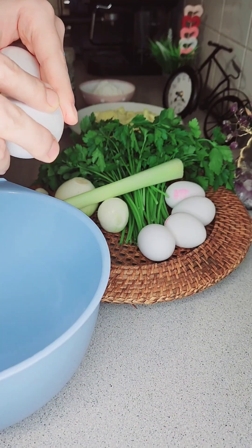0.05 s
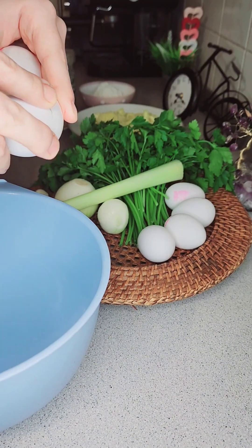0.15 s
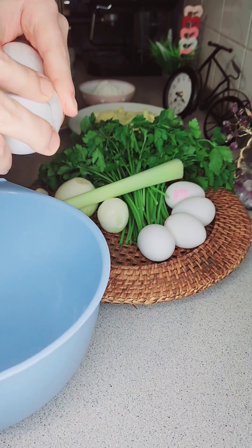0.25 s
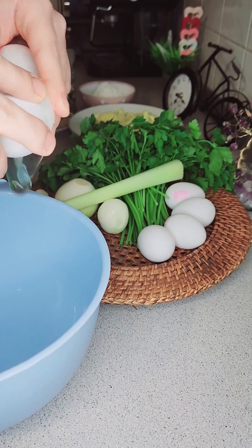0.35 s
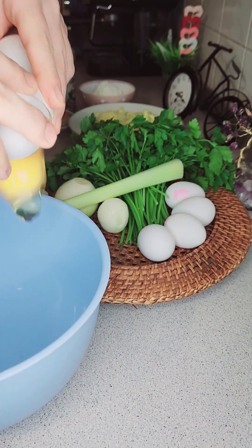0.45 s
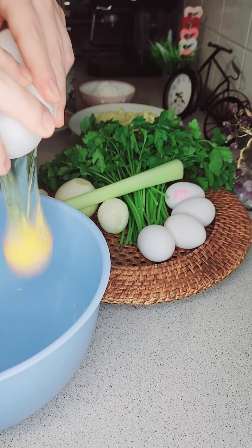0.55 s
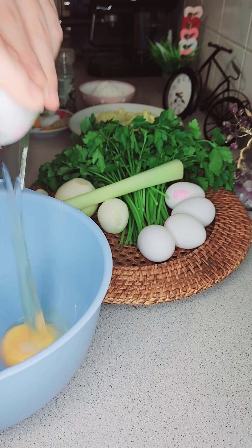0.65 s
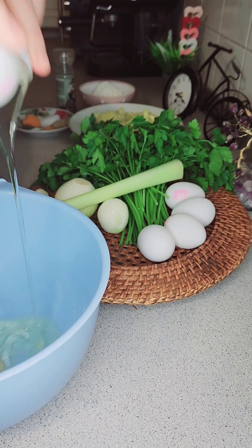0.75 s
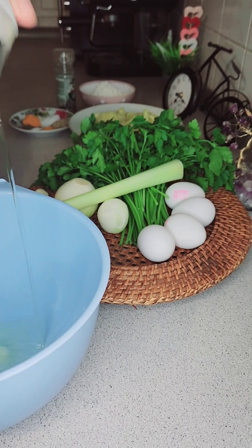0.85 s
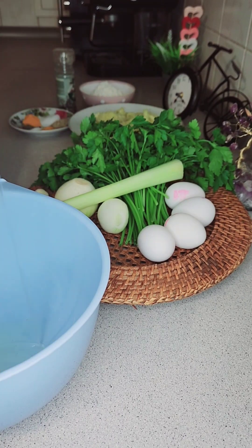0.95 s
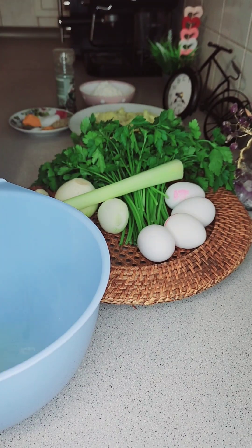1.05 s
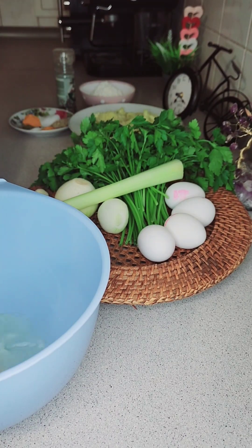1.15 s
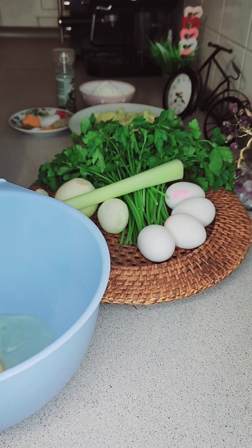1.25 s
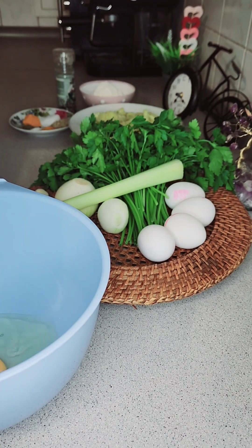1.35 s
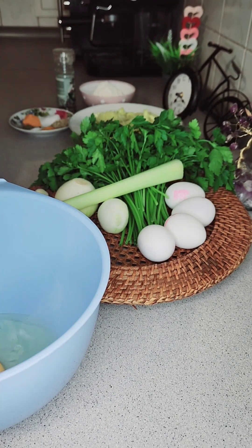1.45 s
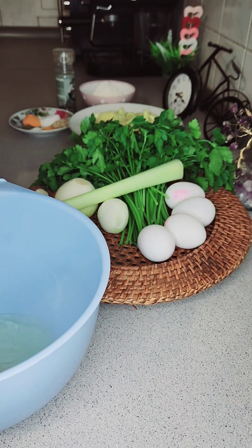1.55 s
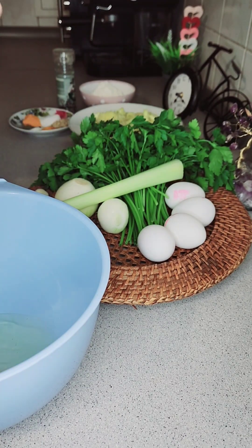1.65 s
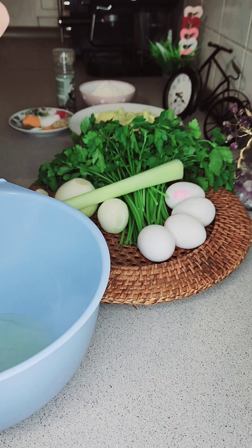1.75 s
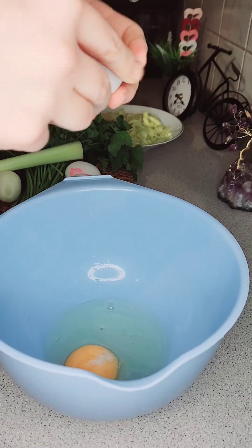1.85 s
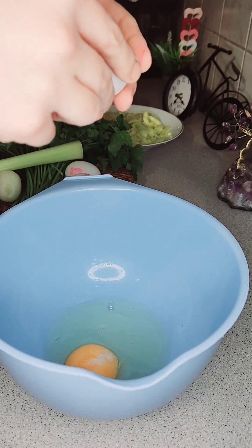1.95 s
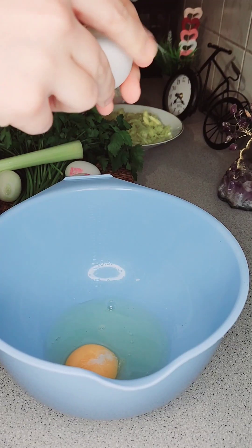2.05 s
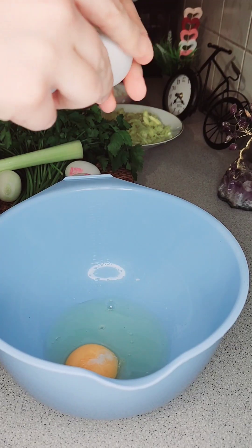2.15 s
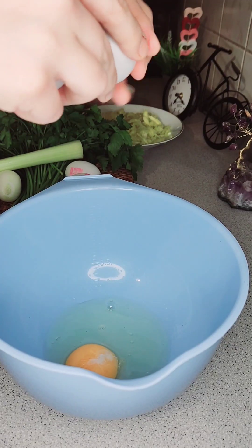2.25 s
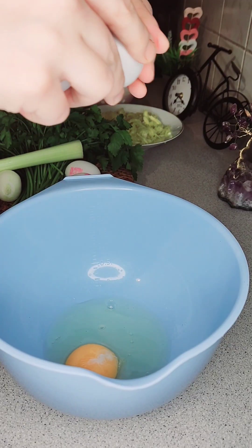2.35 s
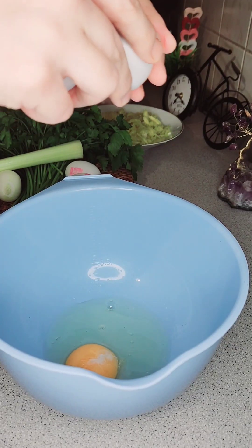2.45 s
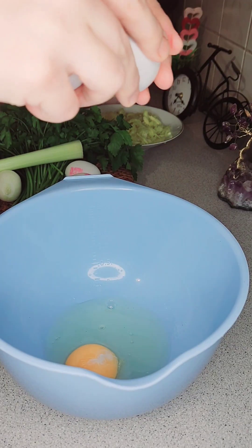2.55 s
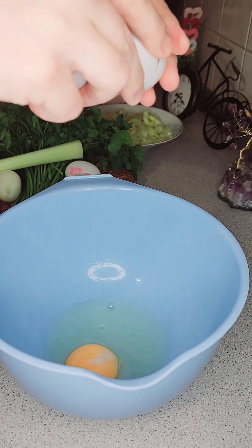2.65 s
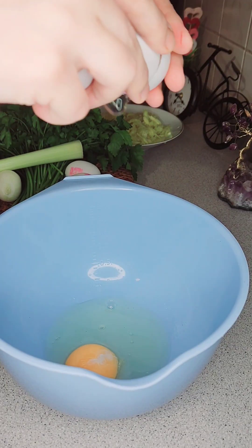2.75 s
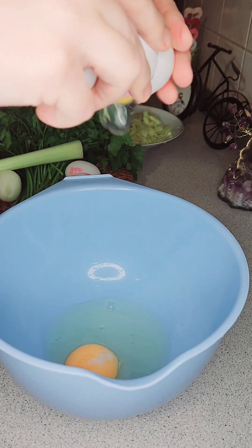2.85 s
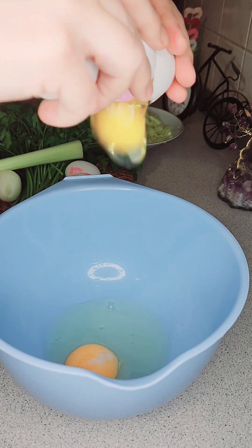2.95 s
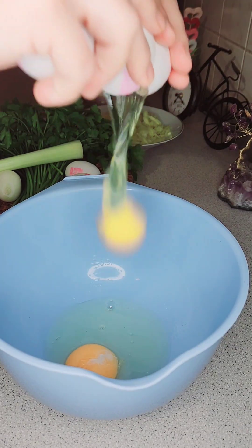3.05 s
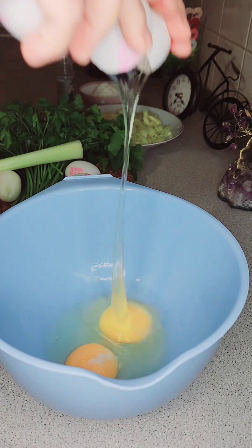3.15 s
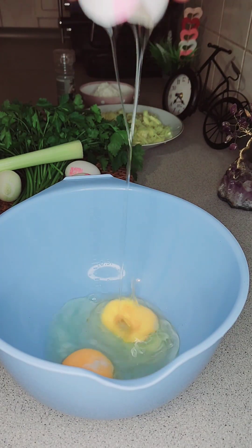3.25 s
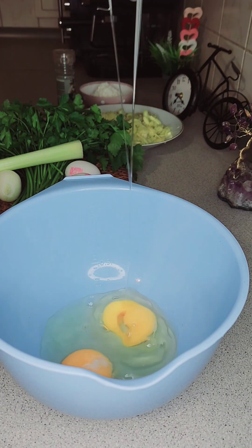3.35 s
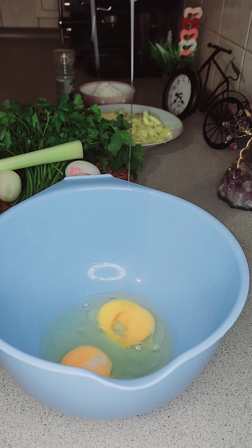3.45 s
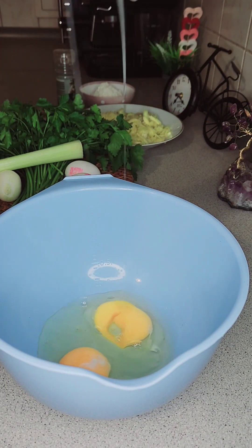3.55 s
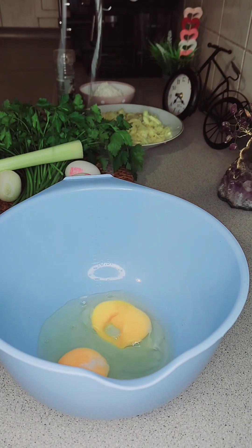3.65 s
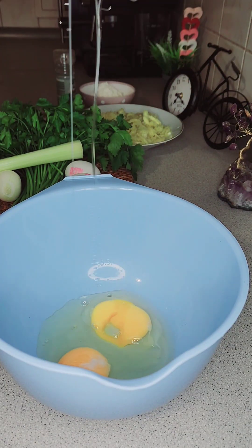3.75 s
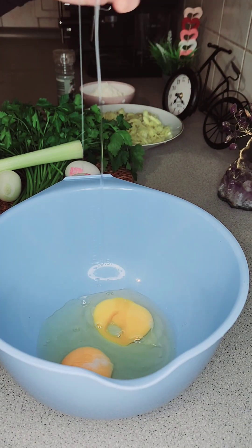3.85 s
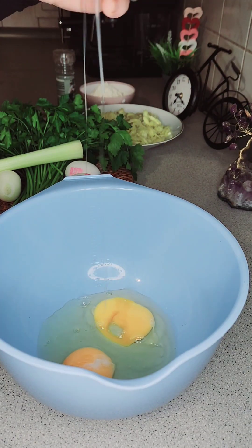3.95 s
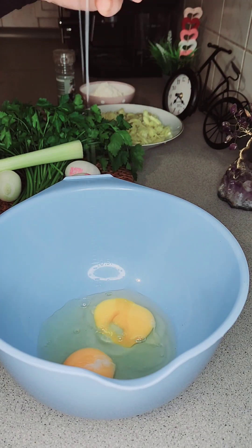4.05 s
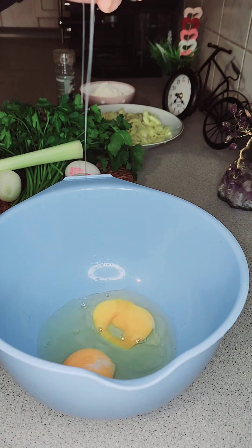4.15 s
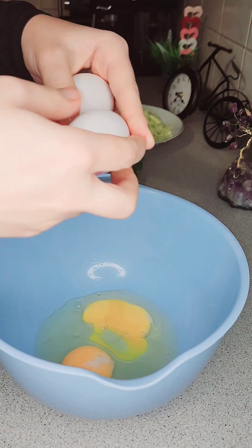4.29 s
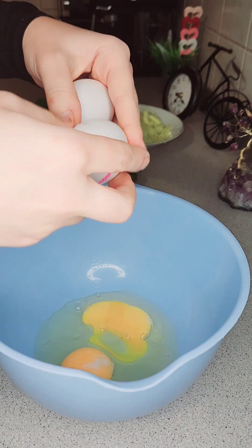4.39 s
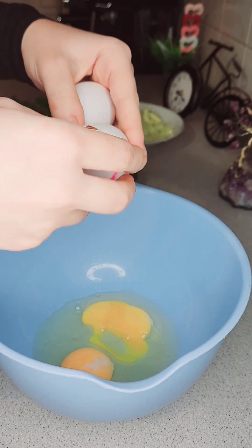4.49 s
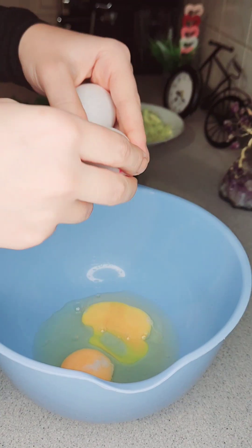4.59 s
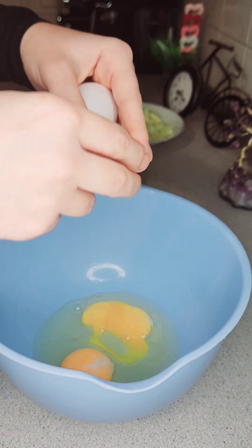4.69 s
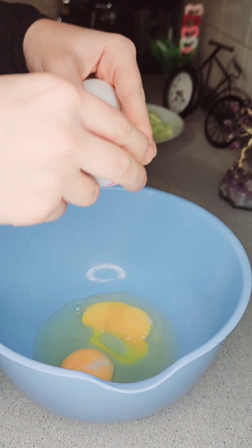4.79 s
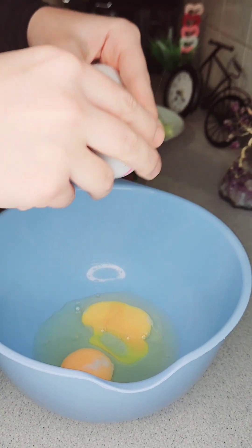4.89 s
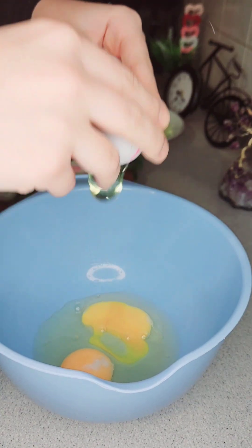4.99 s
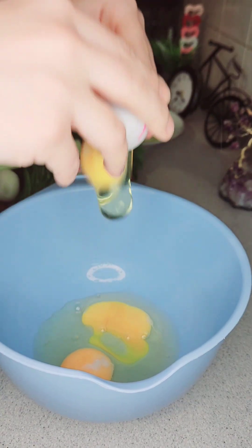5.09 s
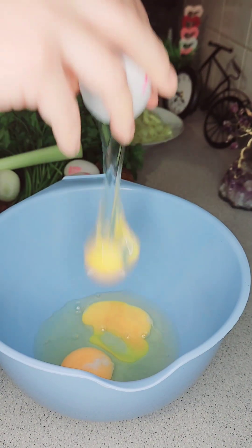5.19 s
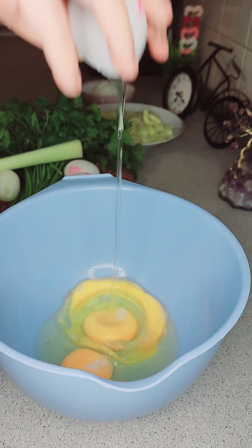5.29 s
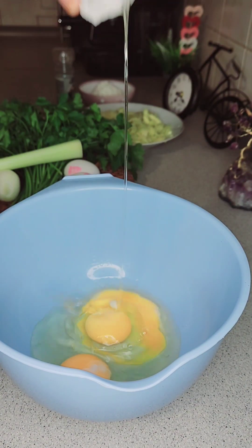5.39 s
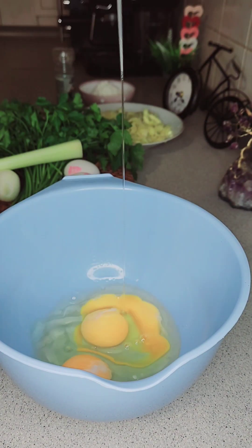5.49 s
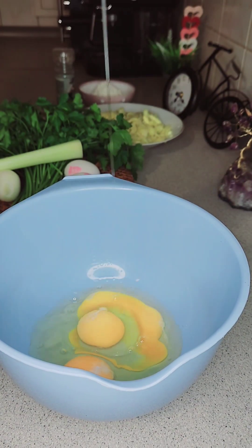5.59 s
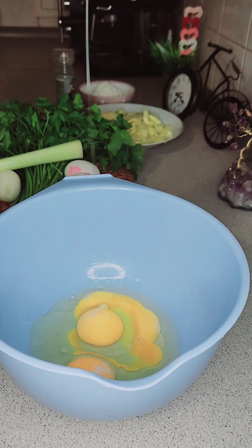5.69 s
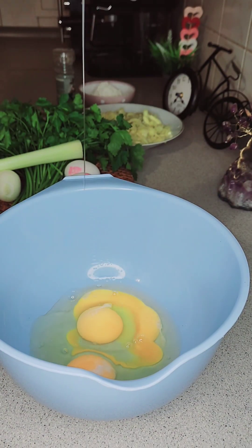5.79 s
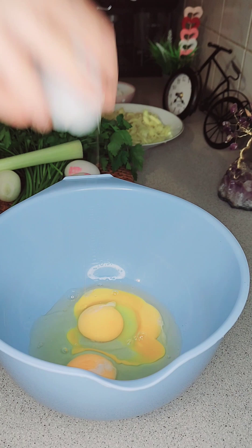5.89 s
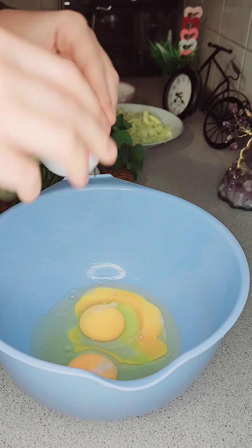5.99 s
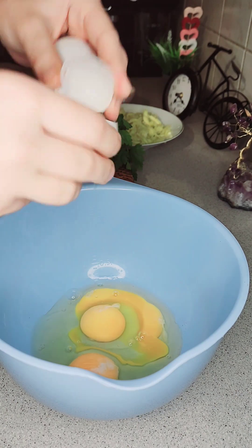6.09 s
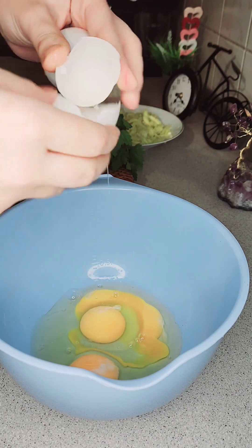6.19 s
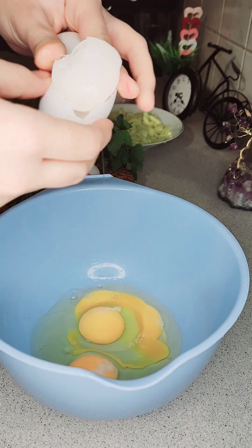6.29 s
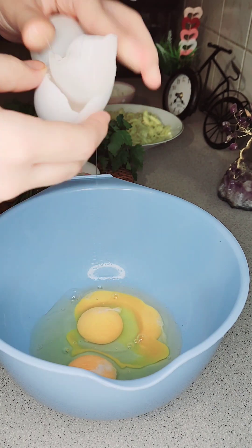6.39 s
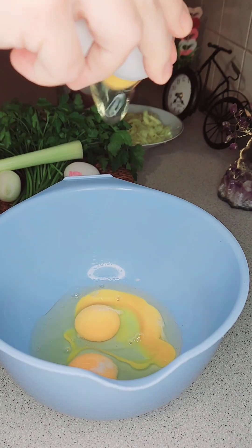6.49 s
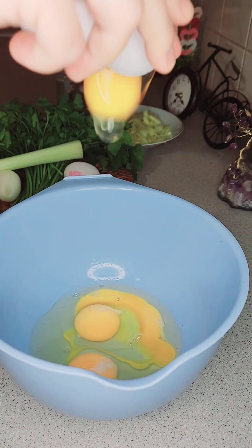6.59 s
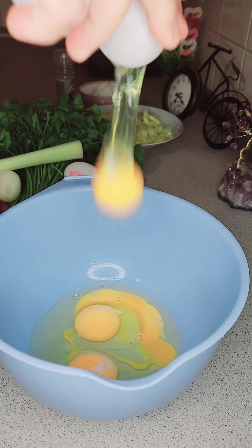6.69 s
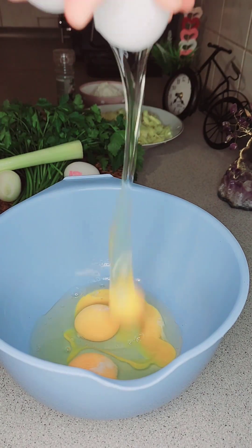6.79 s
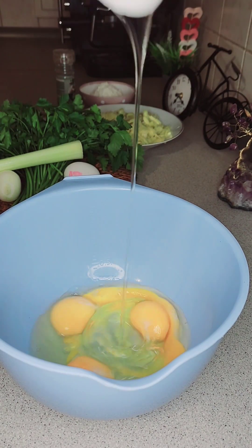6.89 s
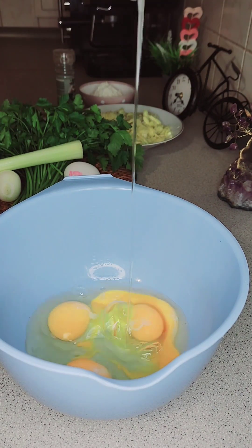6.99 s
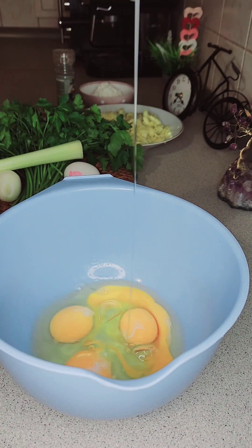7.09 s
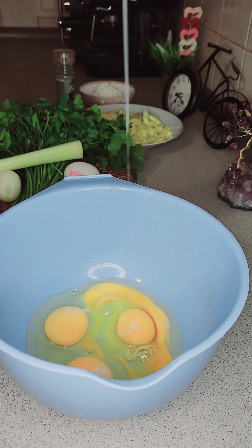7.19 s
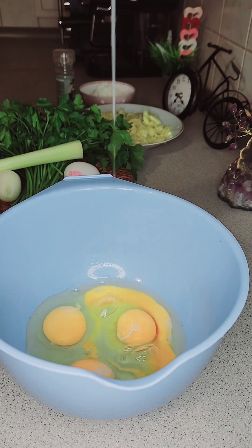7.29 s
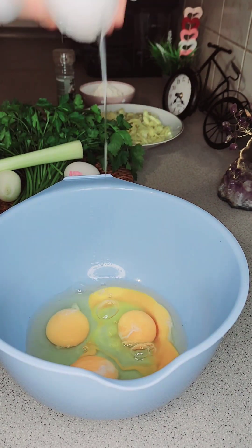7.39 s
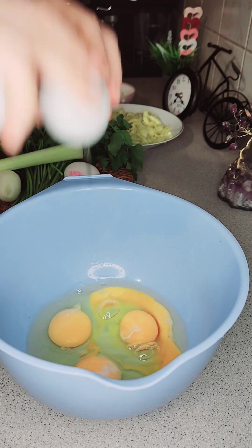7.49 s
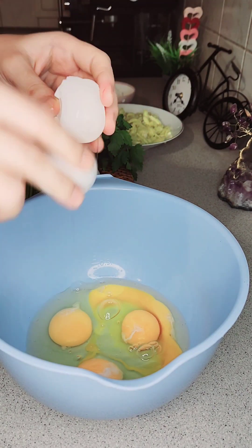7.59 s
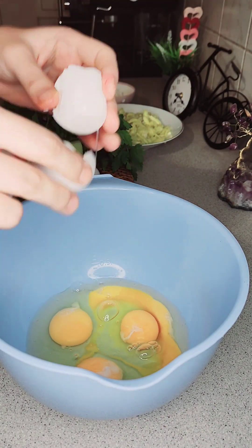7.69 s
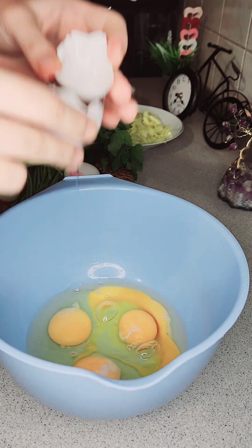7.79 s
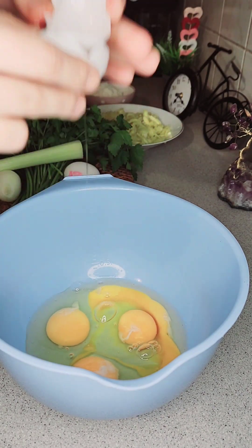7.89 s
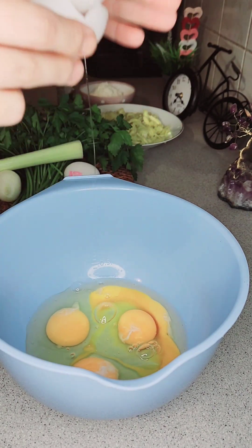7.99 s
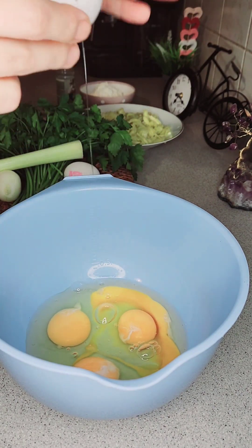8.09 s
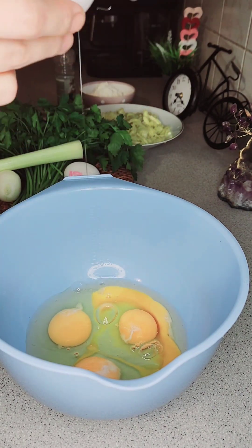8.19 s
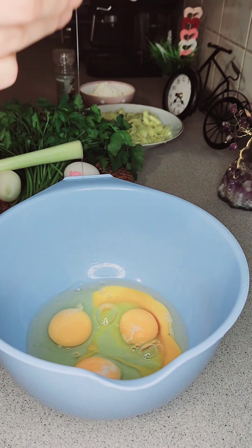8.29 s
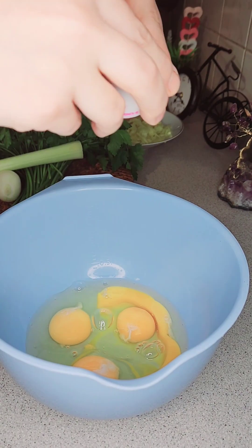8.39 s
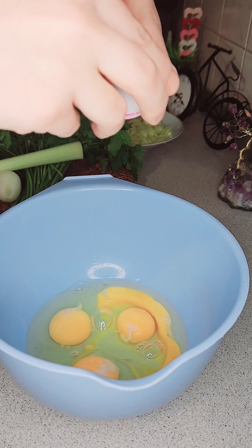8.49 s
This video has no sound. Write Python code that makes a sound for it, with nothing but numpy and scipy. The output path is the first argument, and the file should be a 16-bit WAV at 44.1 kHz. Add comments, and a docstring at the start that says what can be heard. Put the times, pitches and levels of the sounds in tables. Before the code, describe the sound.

A close stereo phone pickup in a quiet kitchen, with steady faint low rumble, murmur, hum and hiss. Faint shell crunches start at once, then sharp dry snaps at 0.25 and 0.35 s. Around 0.6 to 0.8 s more cracks merge with the strongest wet splat, a hollow bowl ring near 600 Hz, a bubble blip and a soft thump. Small ticks and crackles trail off, with light snaps near 1.8 and 2.4 s and a tiny falling squeak at 2.55 s. Crisp snaps and a softer plop come at 3.1 to 3.3 s. Shell edges grind around 4.1 s; a strong crack and crunch at 4.9 s leads to a dull landing at 5.2 s. Cracks at 6.4 to 6.9 s end in another small wet plop with a bubble. Scattered crunches, a brief scrape at 8.05 s and light ticks finish by 8.5 s. Shell sounds lean left with short bright echoes.

```python
"""Hands pry eggs open over a plastic bowl on a kitchen counter, close to a phone held upright.
Faint crunches lead to the first sharp snaps: bursts of noise grains with an unsteady fragment ring.
Yolk and white drop in: a splat, tones of air and bowl, and brief rising bubble tones, here and again later.
Then come a sliding squeak, grinding edges, and more snaps and landings.
Echoes of fading noise follow; shaped noise and a tone make the rumble, murmur, hiss and hum throughout."""
import sys
import numpy as np
from scipy import signal
from scipy.fft import rfft, irfft, next_fast_len
from scipy.io import wavfile
from scipy.ndimage import uniform_filter1d, map_coordinates

SR = 44100
rng = np.random.default_rng(int(sys.argv[2]) if len(sys.argv) > 2 else 0)


def dump(signal):
    """Clip the signal to [-1, 1] and save it as 16-bit WAV at the path in sys.argv[1]."""
    limited = np.clip(np.atleast_2d(signal).T, -1, 1)
    pcm = np.round(limited * 32767).astype(np.int16)
    wavfile.write(sys.argv[1], SR, pcm)


def undo_db(level):
    """Turn decibels back into plain size, where 20 dB means ten times bigger."""
    steps = np.asarray(level, float) / 20
    return 10 ** steps


N = 376569  # length in samples


def unit(x):
    """Scales to rms 1."""
    return x / np.sqrt(np.mean(x ** 2, axis=-1, keepdims=True) + 1e-20)


def along(points, hz):
    """Reads (Hz, value) points on a log frequency axis."""
    f, v = np.transpose(points)
    return np.interp(np.log(hz + 1), np.log(f + 1), v)


def curves(rows):
    """One value per sample for each column after the time."""
    s, *cols = np.transpose(rows)
    return [np.interp(np.arange(N) / SR, s, c) for c in cols]


def filtered(x, response):
    """Multiplies the spectrum of x by a response of frequency."""
    m = next_fast_len(x.shape[-1] + 2048)
    return irfft(rfft(x, m) * response(np.fft.rfftfreq(m, 1 / SR)), m)[..., :x.shape[-1]]


def low_cut(x, cut_hz, power):
    """Fades out what lies below cut_hz, without phase shift."""
    return filtered(x, lambda hz: 1 / (1 + (cut_hz / (hz + 1)) ** power))


def crackle(count, spiky_db, grain_s):
    """Fractures of uneven size: body and treble noise of rms 1 that share the same grain sizes."""
    # color of the shell body: pitch_hz, relative_level_db
    body_color = [(560, -47), (950, -11), (1220, -7), (1520, -7.5), (2050, 4.5), (2610, -4), (3580, -14.5),
                  (3930, -10.5), (6000, -8.5), (7800, -24.5), (13200, -120)]
    # color of the shell treble: pitch_hz, relative_level_db
    treble_color = [(3240, -21), (5500, -13), (6130, -14.5), (7820, -6), (9330, -23.5), (10500, -22),
                    (11400, -16.5), (12200, -12.5), (14000, -12.5), (16200, -27.5)]
    grain = round(grain_s * SR)
    sizes = undo_db(spiky_db * np.minimum(rng.exponential(size=count // 8 + 1), 3.5))
    grains = sizes[np.arange(count) // grain] * rng.standard_normal((2, count))
    return unit(filtered(grains, lambda hz: undo_db([along(body_color, hz), along(treble_color, hz)])))


def chips(per_s, mid_hz, spread, cycles, spiky_db):
    """Tiny shell chips, each a short ring at its own pitch; rms 1."""
    count = round(per_s * N / SR)
    starts = (rng.random(count) * N).astype(int)
    hz = mid_hz * np.exp(spread * rng.standard_normal(count))[:, None]
    sizes = undo_db(spiky_db * np.minimum(rng.exponential(size=count), 3))[:, None]
    k = np.arange(256)
    rings = sizes * np.exp(-k * hz / SR / cycles) * np.sin(2 * np.pi * hz * k / SR)
    train = np.bincount((starts[:, None] + k).ravel(), rings.ravel(), N + 256)[:N]
    return unit(train)


def snaps():
    """Each break is a dying burst of crackle; the loosened fragment rings unsteadily at its own pitch."""
    # shell snaps: start_s, level_db, fragment_ring_hz, treble_over_level_db, crackle_t60_s
    breaks = [(0.247, -14.5, 3847, -8, 0.064), (0.3587, -18.5, 3310, -1, 0.022),
              (0.614, -44, 3270, -14, 0.071), (0.6372, -17, 1880, -36, 0.045),
              (0.7291, -31, 1835, -21, 0.14), (0.7836, -20, 2630, -5, 0.017), (0.8732, -41, 2060, -7, 0.17),
              (0.9184, -37.5, 2100, -10.5, 0.095), (0.9472, -38.5, 4550, -14, 0.073),
              (1.043, -51, 2285, -10.5, 0.13), (1.2285, -47.5, 2210, -8.5, 0.04),
              (1.8337, -34, 2105, -1.5, 0.038), (1.904, -52.5, 3630, 3.5, 0.042),
              (2.4326, -34, 3820, -6, 0.024), (2.601, -36.5, 3230, -32, 0.064),
              (2.7573, -41, 2260, -4, 0.15), (2.8176, -39, 2057, -5.5, 0.077),
              (2.878, -44, 1990, -2.5, 0.046), (3.0696, -31, 4000, -10, 0.091), (3.18, -45, 6450, -6, 0.04),
              (3.206, -18, 4430, -9.5, 0.016), (3.268, -20, 1980, -6, 0.012),
              (3.7715, -52.5, 2160, 3.5, 0.069), (4.502, -33, 1200, -19, 0.049),
              (4.5273, -46.5, 3260, 11, 0.035), (4.62, -59.5, 6500, 1.5, 0.023),
              (4.661, -53, 6550, 0, 0.023), (4.71, -57, 6070, -0.5, .02), (4.785, -54.5, 4000, 2, 0.023),
              (4.8583, -35.5, 5270, 0, 0.063), (4.874, -19.5, 4460, -5.5, 0.03),
              (5.114, -31, 1655, -11.5, 0.083), (5.2058, -32, 1860, -38, 0.16),
              (5.2359, -39.5, 5340, 13.5, 0.036), (5.575, -43, 2400, -8.5, 0.11),
              (5.697, -50, 3180, -4, 0.17), (5.7158, -35.5, 3190, -3.5, 0.066),
              (5.873, -56, 3030, -2.5, 0.024), (6.345, -49, 2470, -2.5, 0.047),
              (6.4167, -28, 1970, -4, 0.046), (6.5953, -34, 1420, -7.5, 0.034),
              (6.744, -40, 2010, -9, 0.095), (6.7867, -40.5, 1998, -13.5, 0.25),
              (6.8533, -30, 2920, -6, 0.014), (6.8725, -27, 1630, -10.5, 0.037),
              (7.2353, -32, 5420, -32, 0.081), (7.281, -33, 3735, -6, 0.14),
              (7.6522, -39.5, 2350, -16, 0.038), (7.7922, -47, 5760, -6, 0.026),
              (8.2232, -34.5, 2436, -9, 0.057), (8.383, -65.5, 2710, 17, 0.036)]
    body_db, ring_db = -11.5, -5  # over the level of the snap
    out, t = np.zeros(N + SR), np.arange(8192) / SR
    for s, db, ring_hz, treble_db, t60 in breaks:
        fade = undo_db(-60 * t / t60) * (1 - np.exp(-t / 0.00082))
        body, bright = crackle(len(t), spiky_db=1.1, grain_s=0.00095)
        wander = np.cumsum(rng.standard_normal(len(t))) / 3
        ring = np.sin(2 * np.pi * ring_hz * t + wander)
        burst = undo_db(body_db) * body + undo_db(treble_db) * bright + undo_db(ring_db) * ring
        out[round(s * SR):][:len(t)] += undo_db(db) * fade * burst
    return out[:N]


def crunch():
    """Fingers crush the shell: dense tiny fractures and ringing chips; some start at once, others swell."""
    # squeezes that crush or tear the shell: start_s, rise_s, fall_s, level_db, treble_over_level_db
    squeezes = [(0, .001, 0.05, -54.5, 0), (.084, 0.0013, 0.037, -67, 7.5), (.168, .002, .04, -69, 8),
                (.193, .003, 0.095, -54, -4.5), (0.227, 0.00072, .06, -36.5, -6),
                (1.755, 0.0024, 0.09, -46, -7.5), (2.2, 0.035, 0.2, -63.5, 15),
                (3.474, 0.0011, 0.023, -53.5, 0), (4.042, 0.003, .02, -36.5, -13.5),
                (4.465, 0.031, 0.094, -48, -4), (4.874, 0.0074, .07, -30.5, -7),
                (4.929, 0.009, .025, -20, -18.5), (4.95, 0.0056, 0.069, -46, -5),
                (5.284, 0.039, 0.043, -34, -10), (6.2, .028, 0.058, -40.5, -6),
                (6.4793, 0.0009, 0.072, -37.5, -1.5), (6.983, 0.0009, 0.023, -48.5, -3),
                (7.1055, .001, 0.012, -39, -18), (7.1678, 0.00082, 0.096, -42, -6.5),
                (7.854, 0.0092, 0.11, -33.5, -17), (8.006, 0.021, 0.044, -38, -2.5),
                (8.12, .01, .12, -52, -3)]
    rise_power, fall_power = 1.2, 1.96  # bend of the rising and the falling ramp
    body, bright = crackle(N, spiky_db=4.5, grain_s=0.002)
    ringing = chips(per_s=450, mid_hz=2640, spread=0.287, cycles=7.6, spiky_db=4.5)
    body = undo_db(-4.5) * body + undo_db(-7.0) * ringing
    out, t = np.zeros(N), np.arange(N) / SR
    for s, rise, fall, db, treble_db in squeezes:
        onset = np.clip((t - s) / rise, 0, 1) ** rise_power
        fade = np.clip(1 - (t - s - rise) / fall, 0, 1) ** fall_power
        out += undo_db(db) * onset * fade * (body + undo_db(treble_db) * bright)
    return out


def grinds():
    """Broken edges rub under steady pressure: uneven crackle plus chips that ring near one pitch."""
    # steady presses: start_s, length_s, level_db, treble_over_level_db, rasp_hz
    presses = [(4.05, 0.1, -36, -6, 3610), (4.154, 0.063, -43.5, -13, 2160), (4.43, .03, -55.5, -12, 3000),
               (8.05, 0.07, -33, -4, 2720)]
    grip_s, let_go_s = 0.0062, 0.0093  # edges of a held press
    out, t = np.zeros(N), np.arange(N) / SR
    body, bright = crackle(N, spiky_db=5, grain_s=0.003)
    for s, length, db, treble_db, hz in presses:
        press = np.clip(np.minimum((t - s) / grip_s, 1 - (t - s - length) / let_go_s), 0, 1)
        rasp = chips(per_s=300, mid_hz=hz, spread=0.12, cycles=14, spiky_db=4.5)
        rub = undo_db(-3.5) * body + undo_db(-9) * rasp + undo_db(treble_db) * bright
        out += undo_db(db) * press * rub
    return out


def squeak():
    """A wet fingertip slips on the shell: a rough whistle that slides down in pitch."""
    # path of the slide: time_s, pitch_hz, level_db
    slide = [(2.551, 5620, -44.5), (2.575, 4300, -59), (2.599, 3280, -65)]
    s, hz, db = np.transpose(slide)
    t = np.arange(N) / SR
    phase = np.cumsum(2 * np.pi * np.interp(t, s, hz) / SR + 0.3 * rng.standard_normal(N))
    return undo_db(np.interp(t, s, db, -120, -120)) * np.sin(phase)


def ticks(per_s, db, spread_db, t60):
    """Faint stray ticks of shell and wet fingers: dying crackle at random moments."""
    count, t = round(per_s * N / SR), np.arange(2048) / SR
    sizes = undo_db(db + spread_db * rng.standard_normal(count))
    starts = np.bincount(rng.integers(0, N, count), sizes, N)
    body, bright = crackle(N, spiky_db=0.5, grain_s=0.00082)
    return signal.fftconvolve(starts, undo_db(-60 * t / t60))[:N] * (0.49 * body + bright)


def air_ring(hz, db, t):
    """The air in the bowl rings in a main mode and two weak ones, with a fast and a slow decay."""
    drift = np.cumsum(rng.standard_normal(len(t))) / 35  # random phase: the tone is slightly unsteady
    modes = np.sin(2 * np.pi * hz * t + drift)
    modes += 0.12 * np.sin(2 * np.pi * hz * 0.94 * t)
    modes += 0.11 * np.sin(2 * np.pi * hz * 1.6 * t)
    decay = undo_db(db - 60 * t / 0.063) + undo_db(db - 16 - 60 * t / 0.24)
    return decay * (1 - np.exp(-t / 0.0037)) * modes


def wet_splat(db, t):
    """The wet landing is a very short burst of mostly low noise."""
    # color of the landing: pitch_hz, relative_level_db
    splat_color = [(120, -30), (230, 0), (450, -2), (1200, -8), (2500, -35)]
    noise = unit(filtered(rng.standard_normal(len(t)), lambda hz: undo_db(along(splat_color, hz))))
    return undo_db(db - 60 * t / 0.022) * noise


def bowl_rock(db, t):
    """The bowl rocks on the counter: low decaying modes, excited a little differently each time."""
    # modes of the rocking bowl: pitch_hz, relative_level_db, t60_s
    bowl_modes = [(34.25, -2.5, 0.75), (74.4, 12, 0.13), (99.8, 10, 0.15), (188.4, 4.5, 0.13),
                  (315, -21, 0.068)]
    rock = np.zeros(len(t))
    for hz, level, t60 in bowl_modes:
        rock += undo_db(level + rng.normal(0, 2.5) - 60 * t / t60) * np.sin(2 * np.pi * hz * t)
    return undo_db(db) * (1 - np.exp(-t / 0.016)) * rock


def plops():
    """A landing splats, rings the air in the bowl and rocks the bowl; returns slap and thump."""
    # egg landing in the bowl: start_s, air_ring_level_db, thump_level_db, air_ring_hz, splat_level_db
    landings = [(.637, -27, -40, 588, -31), (0.738, -34, -39, 600, -34.5), (.75, -38, -38, 590, -43),
                (0.783, -16.5, -41, 604, -30), (3.135, -34, -39, 580, -54), (3.224, -33.5, -47, 572, -42),
                (5.237, -48, -31, 620, -42.5), (6.805, -47, -36, 533, -58), (6.846, -50, -40, 626, -55),
                (6.905, -31.5, -49, 725, -45.5)]
    slap, thump, t = np.zeros(N + SR), np.zeros(N + SR), np.arange(SR) / SR
    for s, db, thump_db, hz, splat_db in landings:
        at = round(s * SR)
        slap[at:at + SR] += air_ring(hz, db, t) + wet_splat(splat_db, t)
        thump[at:at + SR] += bowl_rock(thump_db, t)
    return slap[:N], thump[:N]


def blips():
    """A bubble in the egg white rings briefly and its pitch climbs as it reaches the surface."""
    # popping bubbles: start_s, level_db, starting_pitch_hz, t60_s
    bubbles = [(0.7075, -25, 1810, 0.049), (5.072, -43, 1625, 0.16), (6.88, -30, 860, 0.066)]
    out, t = np.zeros(N + SR), np.arange(4096) / SR
    for s, db, hz, t60 in bubbles:
        wander = np.cumsum(rng.standard_normal(len(t))) * 0.16
        tone = np.sin(2 * np.pi * hz * (t + 0.8 * t * t) + wander)
        out[round(s * SR):][:len(t)] += undo_db(db - 60 * t / t60) * (1 - np.exp(-t / 0.0011)) * tone
    return out[:N]


def ports(x, lead_s, left_db):
    """The left port hears a near source earlier and at its own level; left_db is (Hz, dB) points."""
    side = np.array([[1], [-1]])

    def response(hz):
        return undo_db(side * along(left_db, hz) / 2) * np.exp(1j * np.pi * hz * lead_s * side)
    return filtered(x, response)


def kitchen(x):
    """Bowl and counter answer first with a short bright echo; tiles and cupboards give a longer tail."""
    # decay of the tiles and cupboards: pitch_hz, t60_s
    room_decay = [(300, 0.51), (2000, 0.28), (7000, 0.28), (14000, 0.08)]
    hop = SR // 5  # each fifth of a second gets its own random noise echo
    pieces = np.pad(x, (0, -N % hop)).reshape(-1, 1, hop)
    hz, t, z = signal.stft(rng.standard_normal((len(pieces), 2, 2 * hop)), SR, nperseg=256)
    hz = hz[:, None]
    late = undo_db(-60 * t / along(room_decay, hz))
    early = hz / 5000 * undo_db(-60 * t / 0.014)
    tails = signal.istft(z * (late + early), SR, nperseg=256)[1][..., :2 * hop]
    wet = signal.fftconvolve(pieces, unit(tails) / np.sqrt(2 * hop), axes=2)
    out = np.zeros((2, N + SR))
    for k, piece in enumerate(wet):
        out[:, k * hop + 90:][:, :piece.shape[1]] += piece  # echoes start 90 samples late
    return out[:, :N]


def rush(spectrum, patchy_db):
    """Stereo noise of rms 1 with patches of random gain over time and frequency."""
    # stereo width: pitch_hz, left_right_likeness (correlation, no unit)
    likeness = [(60, 0.96), (180, 0.94), (550, 0.45), (1650, -0.18), (4970, -0.48), (15000, 0.57)]
    z = signal.stft(rng.standard_normal((2, N)), nperseg=512)[2]
    field = uniform_filter1d(rng.standard_normal(z.shape[1:]), size=6, axis=0)
    field = uniform_filter1d(field, size=14, axis=1)
    pair = signal.istft(z * undo_db(patchy_db * field / field.std()), nperseg=512)[1][:, :N]

    def response(hz):
        angle = np.arccos(np.clip(along(likeness, hz), -1, 1)) / 2
        return undo_db(along(spectrum, hz)) * [np.cos(angle), np.sin(angle)]
    mid, side = filtered(pair, response)
    return unit(np.array([mid + side, mid - side]))


def hum():
    """A faint compressor hum whose level and phase waver."""
    hum_hz, level_db, waver_db = 101.6, -63.5, 5
    slow = map_coordinates(rng.standard_normal(40), [np.arange(N) * 3 / SR])  # 3 random points a second
    phase = 2 * np.pi * hum_hz * np.arange(N) / SR + np.cumsum(rng.standard_normal(N)) * 0.0199
    return undo_db(level_db + waver_db * slow) * np.sin(phase)


def background():
    """Rumble of a refrigerator or distant traffic, room murmur, hiss of two microphones, and hum."""
    # layer levels, before the left and right trims: time_s, rumble_db, murmur_db, hiss_db
    layer_levels = [(0, -55, -64.5, -70), (1.5, -57, -65, -74.5), (2.7, -54.5, -62, -68.5),
                    (3.3, -54.5, -63, -72.5), (6.9, -55.5, -64.5, -71), (8.54, -59, -67.5, -74)]
    # color of the low rumble: pitch_hz, relative_level_db
    rumble_color = [(12, -54), (20, -31), (40, 4), (64, -35), (85, 6), (102, 1), (184, -1.5), (231, -11.5),
                    (260, -30.5), (340, -44), (570, -120)]
    # color of the broad room murmur: pitch_hz, relative_level_db
    murmur_color = [(140, -17.5), (240, -12.5), (301, -4), (418, -8), (772, -7.5), (879, -4), (1140, -9),
                    (1310, -9), (1900, -22.5), (2470, -60.5), (4180, -120)]
    # color of the microphone hiss: pitch_hz, relative_level_db
    hiss_color = [(1000, -8.5), (1700, -9), (2150, -5), (2340, -3.5), (3650, -6.5), (4200, -7.5),
                  (5080, -8.5), (7760, 0), (9550, -41), (11300, -13), (16200, -14.5)]
    rumble_db, murmur_db, hiss_db = curves(layer_levels)
    rumble = undo_db(rumble_db + [[0.4], [-0.4]]) * rush(rumble_color, patchy_db=2.5)
    murmur = undo_db(murmur_db + [[2.5], [0.5]]) * rush(murmur_color, patchy_db=2.36)
    hiss = undo_db(hiss_db + [[4], [1.5]]) * rush(hiss_color, patchy_db=2.0)
    return rumble + murmur + hiss + hum()


def shell_sounds():
    """All sounds of the shell, which is too thin to radiate bass; the top treble varies over time."""
    # gain of the shell sound above about 9.8 kHz: time_s, gain_db
    top_gain = [(0, -6), (1.5, -2), (3.5, -1.5), (4.5, -2.5), (5.5, -2), (7, -7), (8.2, -3)]
    pressed = low_cut(crunch() + grinds(), cut_hz=1150, power=4)
    shell = snaps() + pressed + squeak() + ticks(per_s=4.4, db=-63, spread_db=2.0, t60=0.027)
    shell = low_cut(shell, cut_hz=800, power=6)
    top = low_cut(shell, cut_hz=9800, power=16)
    return shell + (undo_db(curves(top_gain)[0]) - 1) * top


def scene():
    """Near shell, landings and bubbles at both ports, their kitchen echo, and the background."""
    shell = shell_sounds()
    slap, thump = plops()
    slap = slap + blips()
    near = ports(shell, lead_s=0.0002794, left_db=[(1000, 7.9), (8000, 6.9)])
    near += ports(slap, lead_s=0.00005, left_db=[(600, -0.73)])
    near += ports(thump, lead_s=0.00003, left_db=[(60, 0.94)])
    room = undo_db([[-1.5], [-3]]) * kitchen(shell) + kitchen(slap) / 4
    return near + room + background()


def top_cut(x):
    """Nothing passes above the cut-off."""
    return signal.sosfilt(signal.butter(12, 16990, fs=SR, output="sos"), x)


def record(dry):
    """The phone cuts steeply above its band limit of 16.1 kHz."""
    mix = filtered(dry, lambda hz: 1 / (1 + (hz / 16100) ** 60))
    return top_cut(mix)


dry = scene()
out = record(dry)
dump(out)
```